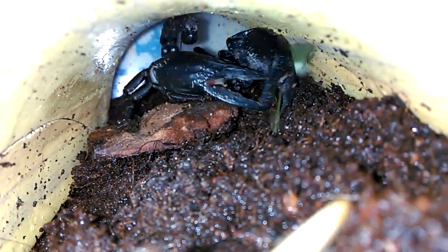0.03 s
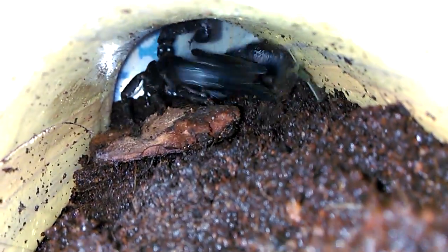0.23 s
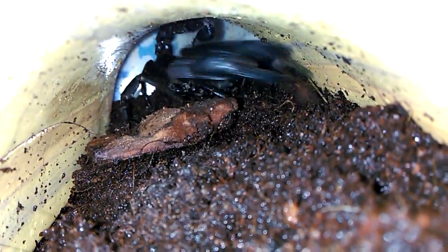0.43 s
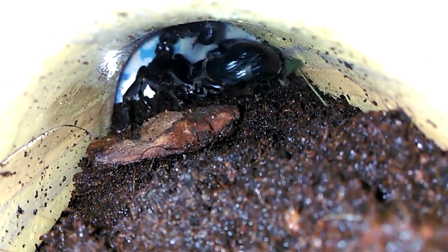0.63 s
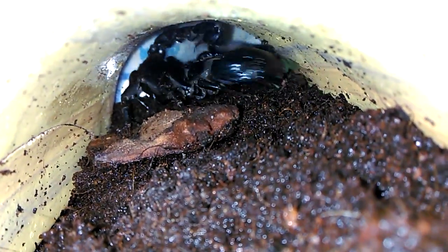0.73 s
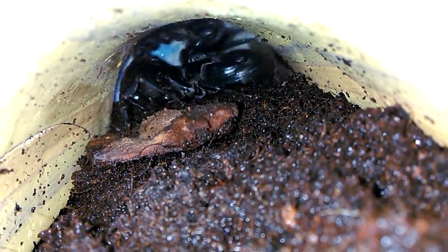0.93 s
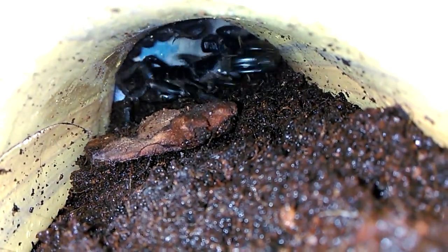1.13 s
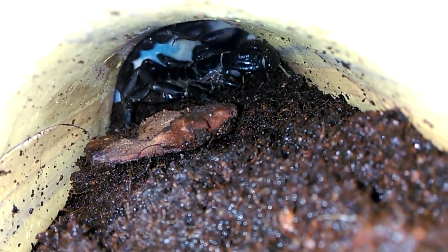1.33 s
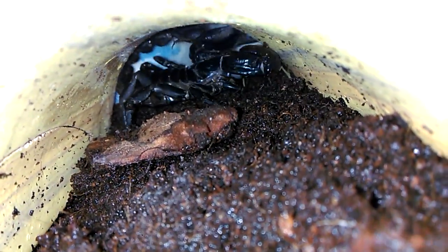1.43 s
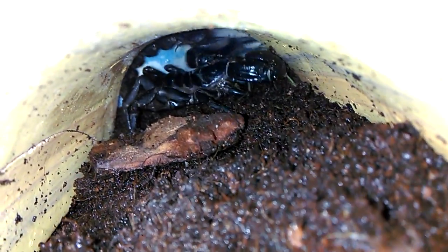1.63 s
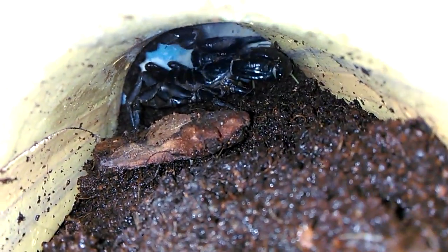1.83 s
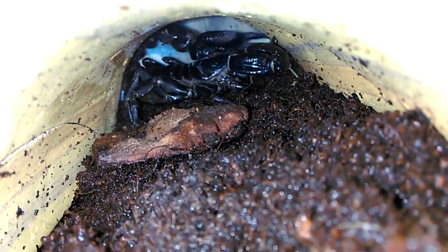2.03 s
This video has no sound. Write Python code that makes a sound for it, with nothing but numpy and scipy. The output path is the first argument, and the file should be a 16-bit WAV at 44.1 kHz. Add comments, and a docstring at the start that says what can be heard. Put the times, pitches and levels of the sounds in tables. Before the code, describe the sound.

Close, short scratching from a scorpion digging in a small hide. A soft swish leads into uneven gritty scrapes that ring with a thin squeak, then fade to quieter ticks, trickling soil and soft bumps. A faint room hum lies underneath.

```python
"""Inside a small hollow hide, a scorpion digs in soil and bark, heard from close by.
Its legs and shell stick and slip, and each slip rings the hide, a resonator, near 1.8 kHz.
Grit rasps along, crumbs snap, soil trickles, the body bumps softly and its weight makes the hide rumble.
A brief swish comes first; a faint room hum lies under everything."""
import sys
import numpy as np
from scipy import signal
from scipy.fft import rfft, irfft
from scipy.io import wavfile
from scipy.ndimage import uniform_filter1d

SR = 44100
rng = np.random.default_rng(int(sys.argv[2]) if len(sys.argv) > 2 else 0)


def int16_out(signal):
    """Quantize to a 16-bit WAV file."""
    q = np.round(np.clip(np.atleast_2d(signal).T, -1, 1) * 32767)
    wavfile.write(sys.argv[1], SR, q.astype(np.int16))


N = 92610
T = np.arange(N) / SR
HZ = np.fft.rfftfreq(N, 1 / SR)
GRIT_PER_S, CRUMB_PAN_DB = 3000, -3.5
# modes of the hide: (frequency [Hz], width [Hz], left gain [dB], right gain [dB], left phase lead [rad])
HIDE_MODES = [(830, 230, 0.3, -6, 3), (1000, 480, -5.5, -6, 6.5), (1460, 235, -2, 4, 8.0),
              (1660, 82, 15.5, 16, 2), (1809.6, 100, 18, 16, 7), (1855.4, 105, 5, 7, 7),
              (2326, 83, -27, 9, -0.3), (2454, 160, -0.5, -3.9, 0.6), (3037, 420, -10, -7.5, 4.5),
              (3308, 190, -2.3, 1.8, 8), (3745, 122, 0, 3.5, 2.5), (4270, 310, -15, -28, 10.5),
              (4430, 77, -32, -9.5, 8), (5460, 380, -24.5, -11.5, 10), (7020, 214, -33, -19.5, -4.8),
              (8060, 180, -46.5, -21.5, 2.3), (10000, 250, -27.5, -30, 8)]


def amp(db):
    """Converts decibels to an amplitude ratio."""
    return 10 ** (np.asarray(db) / 20)


def unit(x):
    """Normalises a signal to rms 1."""
    return x / np.sqrt(np.mean(x ** 2) + 1e-20)


def spectrum(points):
    """Interpolates (frequency, value) points along a logarithmic frequency axis."""
    f, value = np.transpose(points)
    return np.interp(np.log(HZ + 1), np.log(f + 1), value)


def envelope(points):
    """Interpolates (time, level) points in decibels and returns the amplitude."""
    return amp(np.interp(T, *np.transpose(points)))


def colour(x, db):
    """Filters by multiplying the spectrum with a gain given in dB."""
    return irfft(rfft(x, N) * amp(db), N)


def pan(db):
    """Left and right gains for a level difference, left minus right."""
    return amp(np.array([[db], [-db]]) / 2)


def add(mix, onset, sound):
    """Superposes a sound on the mix from an onset in seconds."""
    part = mix[:, max(round(onset * SR), 0):][:, :sound.shape[1]]
    part += sound[:, :part.shape[1]]


def grains(rate, spread_db):
    """Shot noise: a random train of tiny clicks of uneven size, on average `rate` a second."""
    sign = rng.choice([-1, 1], N)
    size = amp(spread_db * np.minimum(rng.exponential(1, N), 4))
    return unit(sign * size * (rng.random(N) < rate / SR))


def hide(force, tilt_db, modes=HIDE_MODES):
    """Modal response: a force is convolved with damped sinusoids, tilted by tilt_db per octave."""
    hz, width, left, right, lead = np.transpose(modes)[:, :, None]
    t = T[:SR // 20]
    fade = amp(tilt_db * np.log2(hz / 1800)) * width ** 2 * t * np.exp(-np.pi * width * t)
    phase = 2 * np.pi * hz * t
    sines = np.array([amp(left) * np.sin(phase + lead / 2), amp(right) * np.sin(phase - lead / 2)])
    response = (fade * sines).sum(1)
    return signal.fftconvolve(force[None], response / np.linalg.norm(response) * np.sqrt(2), axes=1)


def room():
    """Stationary noise: partly coherent hiss and rumble, with narrow noise bands heard as a fuzzy hum."""
    # background spectrum: (frequency [Hz], relative level [dB])
    noise_spectrum = [(12, -79), (20, 1.5), (48, -10), (85, -3.5), (221, -25.5), (284, -5), (524, -20.5),
                      (866, -20.5), (1050, -26), (1180, -26.5), (2300, -29), (2650, -34), (3910, -25.5),
                      (5780, -29.5), (9300, -36), (14500, -37.5), (15800, -67)]
    # likeness of left and right: (frequency [Hz], correlation [-1 to 1])
    correlations = [(50, -0.52), (130, -0.29), (290, 0.56), (600, -0.54), (1400, -0.93), (3000, 0.009),
                    (15000, -0.21)]
    # balance of the background: (frequency [Hz], left minus right [dB])
    level_differences = [(60, 12), (110, -5), (200, 5.5), (380, -9), (700, 4.5), (1300, 10), (4400, -3.5),
                         (9000, 9)]
    # bands of the hum: (frequency [Hz], width [Hz], level [dB])
    hum_bands = [(272, 58, -73.5), (1020, 89, -80.5)]
    left, independent, hum_noise = rfft(rng.standard_normal((3, N)))
    correlation, balance_db = spectrum(correlations), spectrum(level_differences)
    right = correlation * left + np.sqrt(1 - correlation ** 2) * independent
    pair = np.array([left * amp(balance_db / 2), right * amp(-balance_db / 2)])
    noise = unit(irfft(pair * amp(spectrum(noise_spectrum)), N))
    hum = sum(amp(db) * unit(irfft(hum_noise / (1 + ((HZ - hz) / width * 2) ** 2), N))
              for hz, width, db in hum_bands)
    return amp(-63) * noise + hum * pan(db=-11)


def rustle():
    """Loose soil trickles under the legs: many tiny impacts merge into shot noise."""
    # spectrum of trickling soil: (frequency [Hz], relative level [dB])
    soil_spectrum = [(150, 19.5), (330, 3.5), (500, 9), (1200, 4.5), (2400, 5.5), (4000, -1), (5000, -3.5),
                     (9500, 0), (16000, -10)]
    # strength of the trickle: (time [s], relative level [dB])
    levels = [(0.36, -64), (0.722, -62), (0.732, -65), (0.746, -66), (0.83, -63.5), (0.854, -65),
              (1.072, -64), (1.096, -57), (1.14, -65), (1.27, -59), (1.28, -64.5), (1.614, -64.5),
              (1.716, -70), (1.788, -55), (1.798, -65.5), (2.1, -67.5)]
    crumbs = np.array([grains(rate=3300, spread_db=3) for side in range(2)])
    return amp(2.5) * unit(colour(crumbs, spectrum(soil_spectrum))) * envelope(levels) * pan(db=-2)


def swish():
    """Sliding friction: something brushes past with a grainy hiss and a short, rising rubbing tone."""
    # spectrum of the hiss: (frequency [Hz], relative level [dB])
    hiss_spectrum = [(290, -15), (500, -4), (781, -14), (1010, 2.5), (1170, -14), (1800, -4.5),
                     (3100, -5.5), (4380, -5), (4840, -9), (6800, -3), (11500, -14.5), (15500, -20)]
    # envelope of the hiss: (time [s], level [dB])
    levels = [(0, -63.5), (.05, -62), (.08, -56), (.11, -50), (.17, -52), (.21, -52.5), (.228, -59.5),
              (.27, -63), (.36, -65.5), (.42, -98.5)]
    peak_s, half_length_s, tone_hz, glide_hz_per_s = 0.18, 0.032, 266, 600
    grit = np.array([grains(rate=4300, spread_db=2) for side in range(2)])
    hiss = unit(colour(grit, spectrum(hiss_spectrum))) * envelope(levels)
    t = T - peak_s
    phase = 2 * np.pi * (tone_hz + glide_hz_per_s * t / 2) * t
    tone = np.sqrt(2) * np.sin(phase) * np.exp(-(t / half_length_s) ** 2)
    return hiss + amp(-51) * tone * pan(db=-5)


def rumble():
    """Forced vibration: shifting weight drives a soft resonance of the hide near 300 Hz."""
    # low response of the hide: (frequency [Hz], relative level [dB])
    resonance = [(100, -12), (220, -3), (285, 8.5), (350, 4.5), (430, -11), (800, -20), (1200, -15),
                 (2000, -46)]
    # strength of the rumble: (time [s], relative level [dB])
    levels = [(0.0, -57), (0.23, -54.5), (0.6, -66.5), (0.74, -50.5), (0.78, -67), (1.09, -53.5),
              (1.21, -70), (1.29, -52), (1.38, -70), (1.53, -62.5), (1.85, -60), (2.1, -71)]
    vibration = unit(colour(rng.standard_normal(N), spectrum(resonance)))
    return amp(-5) * vibration * envelope(levels) * pan(db=-5)


def bumps():
    """Damped impact: the body nudges the ground, giving a few low cycles and a dull crunch of soil."""
    # bumps of the body: (time [s], level [dB], frequency [Hz], crunch level [dB])
    impacts = [(0.051, -54.5, 212, -52), (.068, -45, 204.5, -56), (0.081, -41.5, 170, -47),
               (0.299, -53, 256, -53.5), (.39, -56, 277, -53.5), (.417, -50, 179, -47.5),
               (.557, -51.5, 316, -69), (.645, -53.5, 185, -78), (0.836, -51, 302, -69),
               (.915, -49.5, 200, -61), (0.929, -58, 193, -57.5), (1.097, -53, 301, -55),
               (1.503, -52, 217, -69), (1.606, -49.5, 170, -55.5), (1.764, -49.5, 217, -55),
               (1.825, -46, 222, -51.5), (1.844, -46.5, 197, -53.5), (1.874, -56.5, 272, -56.5)]
    # spectrum of crushed soil: (frequency [Hz], relative level [dB])
    crunch_spectrum = [(30, 0), (110, 22), (300, 0.5), (700, 11.5), (1100, 5), (2000, 2), (5000, -12),
                       (16000, -65)]
    thud_rise_s, crunch_rise_s = 0.0028, 0.0031
    t, out = T[:SR // 10], np.zeros((2, N))
    soil = unit(colour(rng.standard_normal((2, N)), spectrum(crunch_spectrum)))
    for onset, db, hz, crunch_db in impacts:
        thud_level = amp(db) * t / thud_rise_s * np.exp(1 - t / thud_rise_s)
        add(out, onset, -thud_level * np.sin(2 * np.pi * hz * t) * pan(db=-12))
        age = np.maximum(T - onset, 0) / crunch_rise_s
        out += amp(crunch_db) * age * np.exp(1 - age) * soil * pan(db=-7)
    return out


def snaps():
    """Brittle fracture: crumbs of bark break in short bright bursts that also ring the hide."""
    # breaking crumbs: (time [s], level [dB], decay time [s], tilt [dB/octave])
    fractures = [(0.05, -50, 0.004, -20), (0.3105, -46, 0.0048, -1.5), (.322, -37, 0.0024, -15),
                 (0.4167, -38.5, 0.0026, -18), (.631, -45.5, 0.0024, -15.5), (0.6961, -49.5, 0.0056, -7),
                 (0.7294, -30, 0.0051, -6.5), (.904, -60.5, 0.0062, -1), (1.0603, -42.5, 0.0036, -7),
                 (1.0974, -39, 0.0023, 1), (1.257, -51.5, 0.008, 0), (1.29, -55, 0.014, -15),
                 (1.323, -57, 0.018, -2), (1.42, -54, 0.0031, 2), (1.473, -53, 0.005, -0.5),
                 (1.488, -54, 0.01, 0.5), (1.621, -58, 0.0091, 4), (1.738, -53, 0.0048, 5.5),
                 (1.774, -48.5, 0.0095, 5.5), (1.825, -56.5, 0.022, -3), (1.881, -55.5, 0.0049, -2)]
    # spectrum of a snap before its tilt: (frequency [Hz], relative level [dB])
    crumb_spectrum = [(300, -11.5), (900, -32.5), (2000, -8), (2700, -11), (3700, 2.5), (4500, 1),
                      (5100, -5.5), (5800, 1.5), (6400, -4.5), (9000, -7), (12000, -5), (16000, -19)]
    t, out = T[:SR // 10], np.zeros((2, N))
    octaves = np.log2(np.maximum(HZ, 1500))  # the tilt acts above 1.5 kHz
    for onset, db, decay_s, tilt_db in fractures:
        gain_db = spectrum(crumb_spectrum) + tilt_db * octaves
        burst = colour(rng.standard_normal((2, len(t))), gain_db)[:, :len(t)]
        rise_s = 0.46 * decay_s
        level = amp(db) * np.minimum(t / rise_s, 1) * np.exp(-t / decay_s)
        add(out, onset, level * unit(burst) * pan(CRUMB_PAN_DB))
        add(out, onset, amp(-6) * hide(level * rng.standard_normal(len(t)), tilt_db + 18.5))
    return out


def rasp():
    """Roughness excitation: dragged grit rattles the modes of the hide and fizzes a little on its own."""
    # scrapes: (start [s], end [s], relative start level [dB], relative end level [dB], tilt [dB/octave])
    strokes = [(0.231, 0.25, -53, -55, 15), (0.264, 0.341, -43.5, -47, -15.5),
               (0.342, 0.371, -55.5, -52.5, 1), (0.436, 0.476, -56, -59, -17), (0.48, 0.487, -47, -64, 9),
               (0.518, 0.569, -39.5, -42, 4), (0.567, 0.601, -53, -48, 2), (0.606, 0.709, -73.5, -42, -4),
               (0.718, 0.792, -54, -36, 7.5), (0.807, 0.829, -47.5, -44, 14),
               (0.828, 0.849, -40.5, -55, -14), (0.94, 1.05, -52, -48.5, 6), (1.054, 1.106, -49, -39.5, 10),
               (1.108, 1.136, -44.5, -57, 8), (1.187, 1.256, -57.5, -59.5, 12.5),
               (1.285, 1.346, -52, -65, 5.5), (1.475, 1.54, -76, -59.5, 5), (1.761, 1.83, -50, -60, -1)]
    # spectrum of the grit alone: (frequency [Hz], relative level [dB])
    fizz_spectrum = [(700, -10), (1500, -1), (2300, 3.5), (3000, -4.5), (8000, -14), (16000, -18)]
    fade_s, fizz_exponent = 0.0081, 0.34  # the fizz grows more slowly with force than the ring
    out, grit = np.zeros((2, N)), grains(GRIT_PER_S, spread_db=6)
    fizz = amp(-48) * unit(colour(grit, spectrum(fizz_spectrum))) * pan(CRUMB_PAN_DB)
    for start, end, start_db, end_db, tilt_db in strokes:
        during = (T > start - fade_s) & (T < end)
        t = T[during]
        fade = np.minimum(np.minimum(t - t[0], end - t) / fade_s, 1)
        force = amp(np.interp(t, [start, end], [start_db, end_db])) * fade
        add(out, t[0], amp(-3) * hide(grit[during] * force, tilt_db))
        add(out, t[0], fizz[:, during] * force ** fizz_exponent)
    return out


def slips():
    """Stick-slip friction: each slip squeaks near the main mode; its gritty bite shakes the upper modes."""
    # slips of legs and shell: (peak time [s], level [dB], frequency [Hz], relative bite level [dB])
    releases = [(0.0961, -48, 1797, -52.5), (0.1173, -46.5, 1844, -55), (0.2307, -41, 1834, -54.5),
                (0.2387, -42.5, 1780, -52.5), (0.2494, -41, 1821, -54.7), (0.2605, -35, 1837, -48.5),
                (0.2713, -40, 1817, -57), (0.2756, -32, 1826, -49), (0.2817, -39, 1774, -40),
                (0.289, -34.2, 1794, -56.5), (0.2963, -23, 1818, -41), (0.3018, -30.5, 1783, -47.6),
                (0.3073, -34.5, 1787, -37), (0.3239, -40.5, 1842, -40.5), (0.4189, -49, 1787, -55.5),
                (0.4502, -40, 1768, -52.3), (0.4557, -47.5, 1709, -73.0), (0.474, -40.7, 1803, -54.5),
                (0.4829, -45.5, 1843, -52), (0.509, -38.5, 1754, -51), (0.5172, -35.5, 1816, -40),
                (0.522, -36, 1792, -42), (0.5348, -38.0, 1790, -49), (0.5427, -40.5, 1815, -43),
                (0.547, -36.5, 1792, -39.5), (0.5539, -29.5, 1823, -46.5), (0.5569, -38.5, 1785, -54),
                (0.5677, -41.5, 1728, -42.5), (0.579, -36.5, 1826, -49), (0.6255, -46.5, 1806, -69),
                (0.6721, -44, 1846, -59), (0.6984, -41, 1811, -48.5), (0.7217, -46.5, 1836, -53),
                (0.7353, -35, 1792, -46), (0.7455, -37.5, 1840, -55.7), (0.7569, -33.5, 1812, -50),
                (0.765, -34.5, 1799, -54.5), (0.7706, -37, 1816, -51), (0.7857, -41, 1797, -64),
                (0.8108, -36.5, 1835, -57), (0.8181, -31.1, 1801, -42), (0.832, -39, 1823, -53),
                (0.8438, -49.5, 1832, -68), (0.9072, -50.7, 1806, -55.5), (0.9625, -45, 1816, -56),
                (1.0005, -43, 1768, -47), (1.015, -50, 1838, -51.9), (1.0652, -32.5, 1785, -38.5),
                (1.075, -39.5, 1831, -43.5), (1.0869, -26.5, 1885, -38.5), (1.0887, -37, 1843, -47),
                (1.114, -45, 1799, -45.5), (1.123, -47, 1810, -59.5), (1.2934, -53.5, 1840, -55),
                (1.4905, -51.5, 1797, -61.7)]
    swell_s, ring_decay_s, bite_decay_s = 0.003, 0.0055, 0.0084
    wander_hz, stereo_width = 54.8, 0.98
    main_modes = [mode for mode in HIDE_MODES if 1300 < mode[0] < 2100]
    upper_modes = [mode for mode in HIDE_MODES if mode[0] >= 2100]
    peak_s, db, hz, bite_db = np.transpose(releases)[:, :, None]
    before, after = np.minimum(T - peak_s, 0), np.maximum(T - peak_s, 0)
    swell = np.exp(-(before / swell_s) ** 2)
    power = (amp(db) * swell * np.exp(-after / ring_decay_s)) ** 2 + 1e-16
    wander = unit(uniform_filter1d(rng.standard_normal(N), size=90))
    pitch = (power * hz).sum(0) / power.sum(0) + wander_hz * wander  # the strongest slip leads
    squeak = np.sqrt(2) * np.sin(2 * np.pi * np.cumsum(pitch) / SR)
    resonance = hide(rng.standard_normal(N), tilt_db=1.5, modes=main_modes)[:, :N]
    ring = amp(-2.5) * squeak + amp(-4) * resonance
    ring = ring.mean(0) + stereo_width * (ring - ring.mean(0))
    ring /= np.sqrt(uniform_filter1d((ring ** 2).mean(0), size=200) + 1e-9)  # slips alone set the level
    bite_power = (amp(bite_db - 0.5) * swell * np.exp(-after / bite_decay_s)) ** 2
    bite = hide(grains(GRIT_PER_S, spread_db=3.5), tilt_db=-1, modes=upper_modes)[:, :N]
    return np.sqrt(power.sum(0)) * ring + np.sqrt(bite_power.sum(0)) * bite


def scene():
    """Superposition of the digging animal and the room."""
    return slips() + rasp() + snaps() + bumps() + rumble() + swish() + rustle() + room()


def record(dry):
    """Band limiting: a gentle high-pass filter, then a steep low-pass filter."""
    low_cut_hz, high_cut_hz = 46, 15850
    high_pass = signal.butter(2, low_cut_hz, "high", fs=SR, output="sos")
    low_pass = signal.firwin(511, high_cut_hz, window=("kaiser", 9), fs=SR)
    return signal.oaconvolve(signal.sosfilt(high_pass, dry), low_pass[None], "same")


dry = scene()
out = record(dry)
int16_out(out)
```